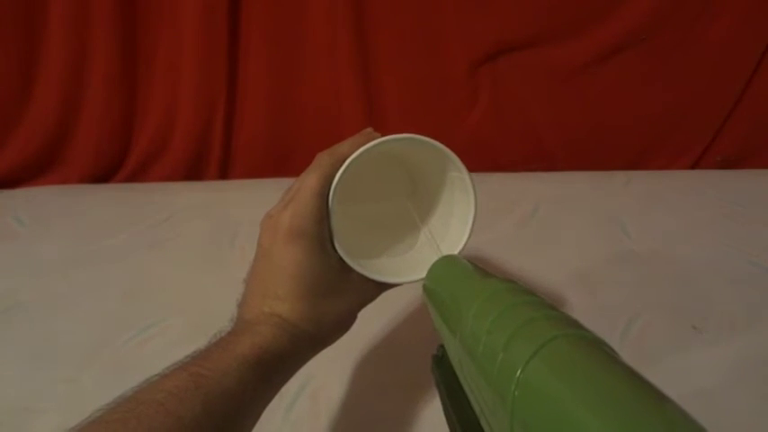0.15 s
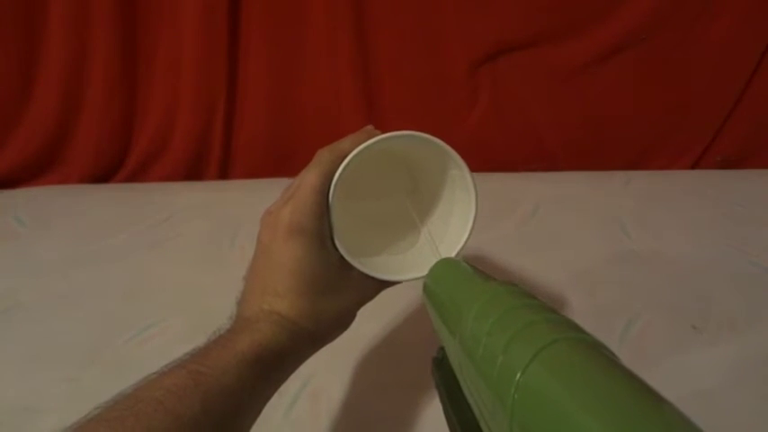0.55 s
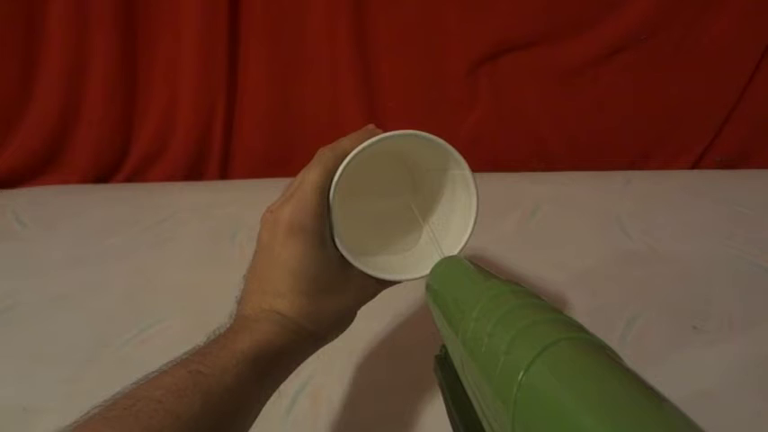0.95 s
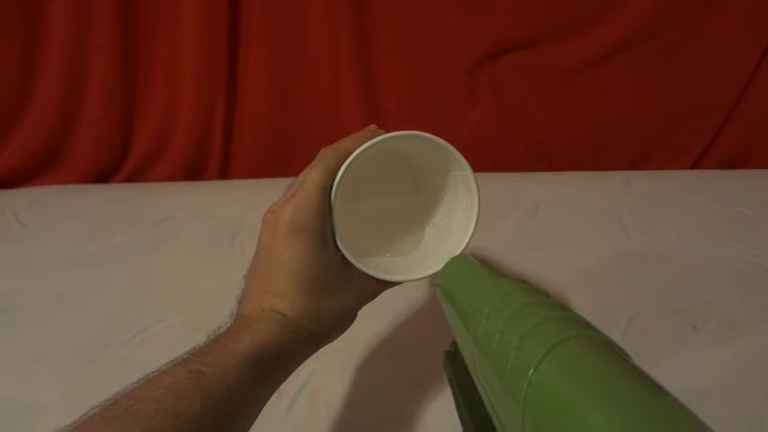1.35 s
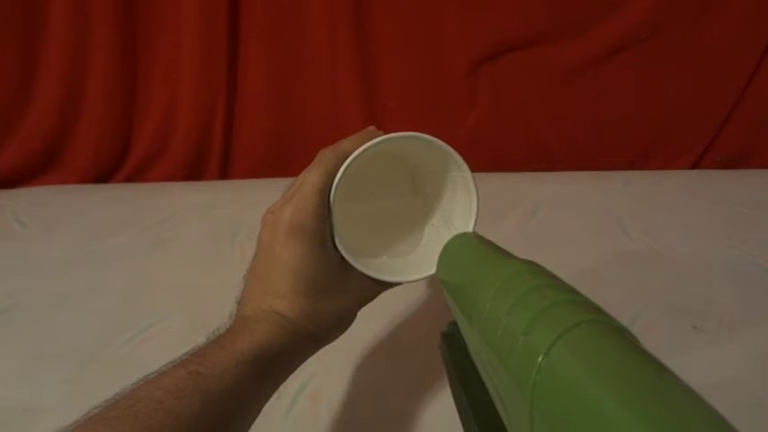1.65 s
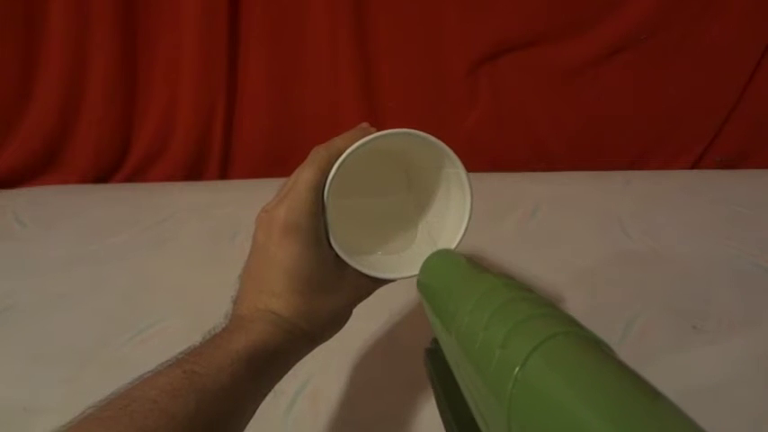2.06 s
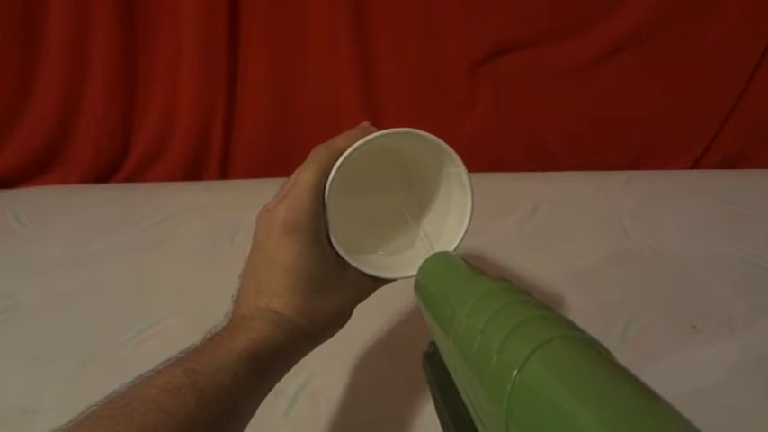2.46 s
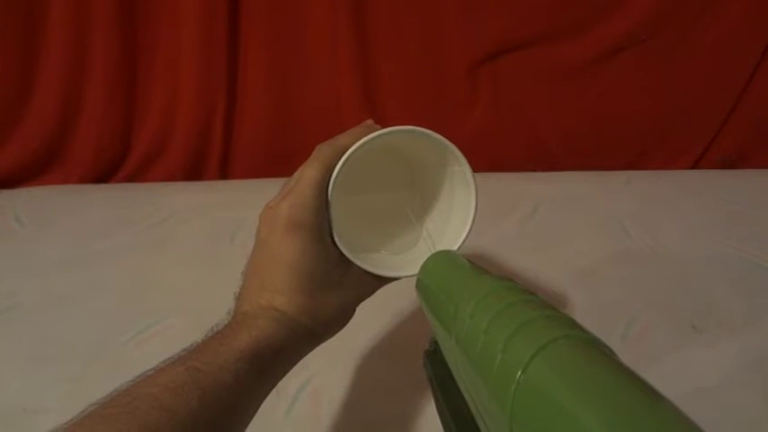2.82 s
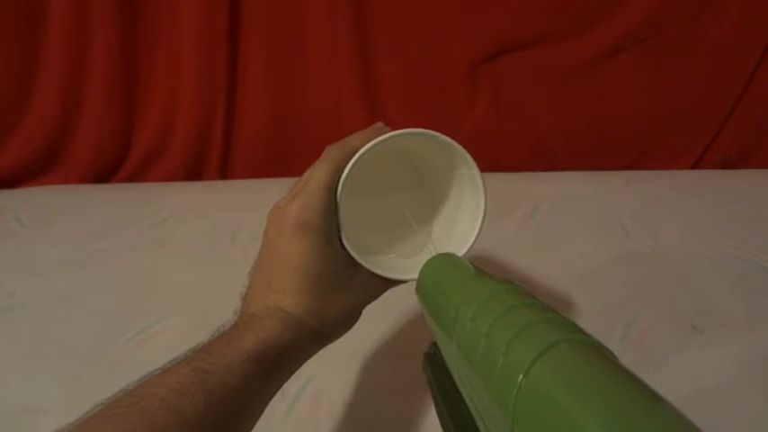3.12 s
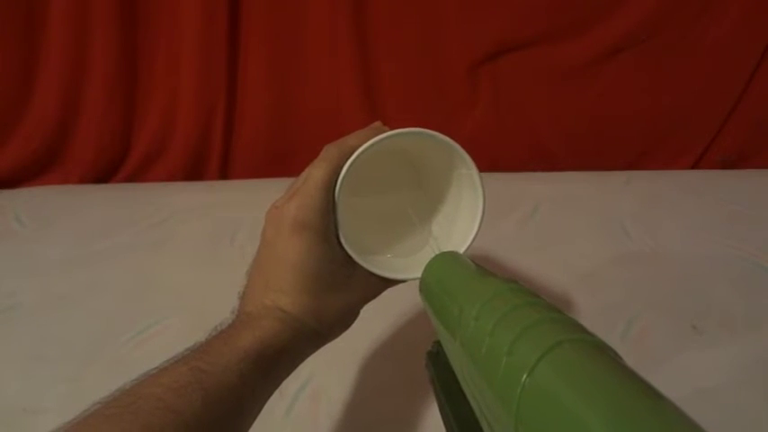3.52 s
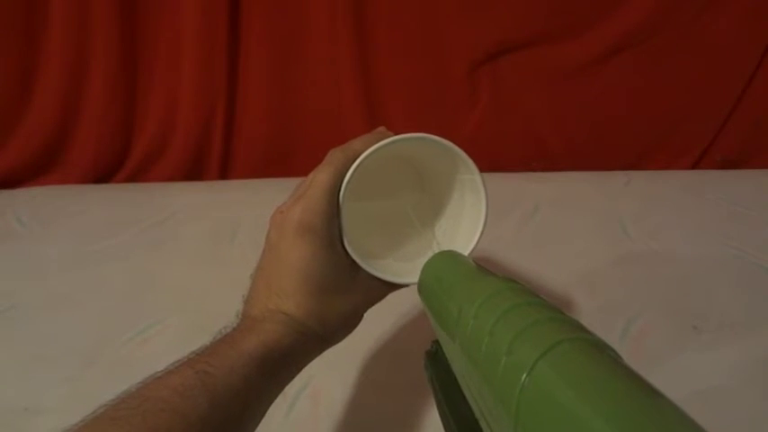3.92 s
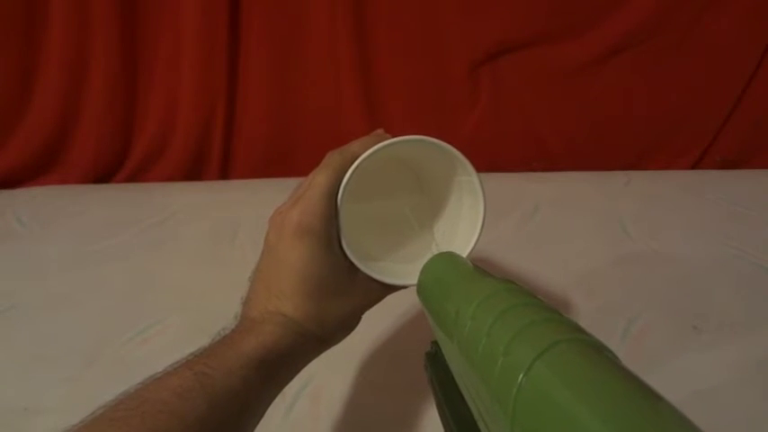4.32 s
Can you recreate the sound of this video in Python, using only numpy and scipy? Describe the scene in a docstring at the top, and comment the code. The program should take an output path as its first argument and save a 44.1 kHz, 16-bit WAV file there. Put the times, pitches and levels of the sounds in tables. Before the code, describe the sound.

Two close, hissing jets of water patter hollowly inside a paper cup, the second longer and ending in a splashy churn.

```python
"""A pump water blaster fires two jets into a hand-held paper cup, close by in a quiet, soft room.
The jet drums the paper wall, whose many modes flare as the spot wanders, and booms the air in the cup.
The nozzle hisses over a faint low shudder, and a few drips ring in the pause. The second squirt opens
as thin mist, lands on the paper, and at the end churns the pooled water."""
import sys
import numpy as np
from scipy import signal
from scipy.io import wavfile
from scipy.ndimage import uniform_filter1d, minimum_filter1d

SR = 44100
rng = np.random.default_rng(int(sys.argv[2]) if len(sys.argv) > 2 else 0)


def pcm_store(signal):
    """Save signal as 16-bit PCM."""
    levels = np.round(np.clip(np.atleast_2d(signal), -1, 1) * 32767)
    wavfile.write(sys.argv[1], SR, levels.astype(np.int16).T)


N = 197607
SIZE, HOP = 2048, 512
HZ = np.fft.rfftfreq(SIZE, 1 / SR)[:, None]
FRAME_S, SAMPLE_S = np.arange(N // HOP + 10) * HOP / SR, np.arange(N) / SR

SHUTS_S = 1.185  # the first squirt ends
# The second squirt: mist starts, the jet lands, rising water damps the cup, the jet sinks in the pool.
MIST_S, LANDS_S, RISES_S, SINKS_S = 1.712, 2.048, 3.284, 3.752
SWELL_OCTAVES, GULP_OCTAVES = 0.26, .35  # reach either side of the centre pitch

# Resonances of the cup: five families in the paper, the paper's lowest modes, three families in the air.
# Each row: pitch in Hz, width in Hz, relative level in dB.
WALL_MODES = [
    [(1877, 82, 1), (2035, 42, 2), (2115, 29, 1.5), (2220, 82, 0.5), (2292, 37, -4)],
    [(2404, 62, 3.5), (2567, 78, 1), (2694, 47, 1), (2747, 40, -3), (2885, 11, 2.5), (2987, 51, 1.5)],
    [(3220, 50, 0), (3196, 53, -3), (3340, 17, 1.5), (3439, 146, 6.5), (3670, 120, -11.5)],
    [(3743, 155, -0.5), (3790, 82, -1), (3993, 150, 1.5), (4110, 74, -8), (4200, 100, -5),
     (4390, 190, -1.5)],
    [(4732, 150, 2.5), (5000, 28, -10), (5200, 64, -2.5), (5078, 82, 3.5), (5340, 54, -1.5), (5300, 160, 0),
     (5487, 93, 5), (5640, 17, -3), (5873, 120, 1.5), (6340, 220, -7)],
]
LOW_WALL_MODES = [(1358, 70, -7.5), (1456, 100, -5.5), (1538, 58, -4), (1682, 350, 5)]
AIR_MODES = [
    [(729.4, 66, 0), (806, 55, -5.5)],
    [(871, 57, -1.5), (928, 48, 1.5)],
    [(1055, 150, -0.5), (1154, 95, 0), (1253, 110, -2)],
]
# How hard the jet plays each family. Each row: centre in Hz, gain in dB for the first squirt, the mist
# and the second squirt, swell time in seconds, slope as the water rises in dB per second, sinking time
# in seconds, gain in the pool in dB, slope from then on in dB per second, wander in dB.
WALL_DRIVE = [(2200, -23, -61, -25.5, 0.027, -6, .03, -37.5, -5, 2),
              (2600, -24, -66, -25, 0.019, -9, .02, -30, -12, 2),
              (3325, -24.5, -66, -20, .008, -4, .015, -25, -11, 1.5),
              (4040, -22.5, -56.5, -22.5, .005, 3, .015, -26, -6.5, 1.5),
              (5440, -22.5, -50, -21, 0.0026, -5.5, .015, -27, 0.5, 1.5)]
LOW_WALL_DRIVE = (1549, -37.5, -67, -36, 0.2, -11.5, .06, -66, -10, 2)
AIR_DRIVE = [(740, -48.5, -71, -40, 0.075, -21, .012, -72, -8, 2.9),
             (884, -44, -77, -36, 0.064, -21, .015, -68, -1, 2.1),
             (1128, -45, -80, -36, 0.06, -8.5, .06, -56, -17, 2.3)]
# Passing swells of the paper and gulps of the air. Each row: peak time in seconds, length in seconds,
# centre pitch in Hz, lift in dB (negative for a dip).
PAPER_SWELLS = [(.05, 0.1, 2340, 7.5), (.13, 0.095, 5300, 6.5), (.15, .3, 3350, -3), (.24, 0.095, 4950, 9),
                (.36, .1, 1550, 5), (.36, .14, 2100, 3), (.48, .12, 1550, -5), (.53, 0.23, 3400, 5),
                (.7, .1, 2300, 5), (.74, .06, 1550, 4), (.85, 0.15, 1580, 5.5), (.88, .12, 2100, 3),
                (.96, .08, 1550, 4), (1.05, .25, 4000, 4), (1.06, .1, 2100, -4), (1.1, .1, 1550, -8),
                (1.14, .12, 5300, 4), (1.15, 0.26, 3200, -5.5), (1.22, .12, 2200, 2.5), (1.9, .15, 1550, 6),
                (2.2, 0.086, 2200, -3), (2.36, .08, 3400, 4), (2.47, 0.17, 2280, 4),
                (2.57, 0.12, 2673, -13), (2.6, 0.11, 3370, 4), (2.7, .05, 2580, 6), (2.7, .1, 5300, -4),
                (2.85, 0.072, 2180, -7), (2.93, 0.16, 4000, 4), (3.05, 0.056, 2700, 6),
                (3.17, .32, 5300, -5), (3.2, 0.096, 1560, 10.5), (3.39, 0.048, 2750, -13),
                (3.5, 0.044, 2800, 5), (3.55, .05, 3200, -6), (3.65, 0.12, 4220, 3),
                (3.78, 0.095, 3800, -21), (4.1, .1, 2100, 4), (4.18, .1, 1550, 8), (4.38, 0.12, 5300, 4)]
AIR_GULPS = [(.078, 0.061, 995, 17.5), (.2, 0.083, 900, 9.5), (.43, .06, 850, 4), (.51, 0.13, 900, 15),
             (.63, .05, 1140, 11.5), (.668, 0.088, 860, 15), (.802, 0.038, 900, 10.5), (.89, 0.039, 890, 5),
             (1.03, 0.029, 900, 7), (1.1, .06, 850, -10), (1.2, 0.069, 920, 16.5),
             (1.235, 0.065, 760, 16.5), (1.33, 0.11, 900, 13), (1.74, .08, 800, 10), (2.03, .1, 820, 16),
             (2.24, 0.059, 1050, 6.5), (2.5, 0.043, 1170, 0), (2.55, .07, 780, -6), (2.65, 0.089, 884, 8.5),
             (2.95, 0.07, 1000, 6.5), (3.11, 0.058, 830, 6.5), (3.27, 0.15, 1060, 2), (3.6, .08, 1150, 3.5),
             (4.18, .1, 1060, 14), (4.45, .08, 820, 13)]
# Fader ride of the hiss, ahead of the valve. Each row: time in seconds, level in dB.
SPRAY_LEVEL = [(0, -29.5), (.06, -21), (.25, -21.5), (.5, -25.5), (1.0, -24.5), (1.15, -20), (1.27, -25),
               (1.72, -34), (1.8, -31), (2.03, -24), (2.3, -24), (2.6, -24.5), (3.0, -23.5), (3.4, -22.5),
               (3.74, -22), (3.79, -17), (3.91, -21.5), (4.26, -17.5), (4.4, -22), (4.48, -20)]
# Crossfade from mist to churning. Each row: time in seconds, share of churning from 0 to 1.
POOL_SHARE = [(0, 0.07), (1.3, 0.2), (1.7, 0.1), (2.0, 0.6), (2.1, 0.3), (2.9, 0.19), (3.3, 0.5), (3.7, .7),
              (3.8, 1), (4.48, 0.96)]
# Tone of thin spray, of the jet in the pool and of the room. Each row: frequency in Hz, relative dB.
MIST_TONE = [(290, -64.5), (500, -36.5), (1160, -49.5), (1730, -21.5), (2210, -9), (2690, -28), (3180, -15),
             (5470, -12), (6070, 0.5), (7960, -5.5), (11000, -11.5), (14300, -55), (22000, -120)]
CHURN_TONE = [(290, -98), (500, -55), (817, -36.5), (930, -20.5), (1110, -23), (1300, -51), (1660, -37),
              (1940, -18), (2550, -16.5), (3710, -4), (4120, -6), (5130, -14), (7960, -13.5), (8720, -8),
              (11000, -4), (14300, -45.5), (22000, -120)]
ROOM_TONE = [(12, -64), (20, -36), (114, -13), (199, -17), (239, -11), (365, -11), (603, -5), (1170, -7.5),
             (1400, -9), (1830, -12), (11000, -24.5), (14300, -67.5), (22000, -120)]
# Bright peaks in the hiss. Each row: centre in Hz, width in Hz, lift in dB.
SIZZLE_PEAKS = [(2196, 100, 0.5), (5040, 300, 6.5), (6920, 200, 4.5), (7590, 80, 1.5), (8680, 790, 3.5),
                (9980, 500, 3), (11030, 200, 4.5)]
# The finest droplets spit. Each row: peak time in seconds, treble tilt in dB.
SPITS = [(1.14, 4), (2.035, 12), (3.11, 3.82), (3.79, 4)]
# Drips in the pause. Each row: start in seconds, level in dB, starting pitch in Hz.
DRIPS = [(1.513, -59, 1740), (1.5394, -65.5, 1486), (1.5763, -60, 1420), (1.5994, -64, 1460),
         (1.6144, -60, 1360), (1.6372, -55.5, 1480)]
# Stereo image of the cup and the room. Each row: frequency in Hz, left-right likeness from -1 to 1.
CUP_LIKENESS = [(60, 0.89), (130, 0.94), (270, 0.92), (570, 0.92), (1210, 0.91), (2570, 0.97), (5450, 0.95),
                (11600, 0.9)]
ROOM_LIKENESS = [(60, 0.91), (220, 0.79), (830, -0.62), (3100, -0.25), (11600, 0.58)]
# Balance of the microphone ports. Each row: frequency in Hz, left minus right in dB.
PORT_LEAN = [(60, 0.8), (170, 0.8), (490, 2), (1410, 1.5), (4040, 1.0), (11600, 0.5)]


def gain_of(db):
    return 10 ** (np.asarray(db) / 20)


def unit_rms(x):
    return x / np.sqrt(np.mean(x ** 2) + 1e-20)


def curve(points):
    """Join (Hz, value) points along a log frequency axis."""
    hz, value = np.transpose(points)
    return np.interp(np.log(HZ + 1), np.log(hz + 1), value)


def drift(rows, ms, across=1):
    """Unit random wander, smooth over ms in time and across neighbouring rows."""
    wander = rng.standard_normal((len(FRAME_S), rows)).T
    frames = max(round(ms * SR / 1000 / HOP), 1)
    for _ in range(2):
        wander = uniform_filter1d(wander, frames, axis=1)
    return unit_rms(uniform_filter1d(wander, across, axis=0))


def flutter(db, ms):
    """Quick random unsteadiness of the jet, as a gain per sample."""
    return gain_of(db * np.interp(SAMPLE_S, FRAME_S, drift(1, ms)[0]))


def noise(colour, likeness=CUP_LIKENESS):
    """Stereo noise that follows a moving colour, every moment equally strong."""
    a, b, c, d = rng.standard_normal((len(FRAME_S), len(HZ), 4)).T
    shared = np.clip(curve(likeness), -1, 1)
    left = a + 1j * b
    right = shared * left + np.sqrt(1 - shared ** 2) * (c + 1j * d)
    spectra = np.array([left, right]) * (colour / np.linalg.norm(colour, axis=0))
    return unit_rms(signal.istft(spectra, nperseg=SIZE, noverlap=SIZE - HOP)[1][:, :N])


def rings(modes, flare_db, ms, skirt):
    """Colour of steep resonances, each swelling and fading on its own."""
    hz, width, db = np.transpose(modes)
    shapes = (1 + (2 * (HZ - hz) / width) ** 2) ** -skirt
    power = gain_of(db[:, None] + flare_db * drift(len(hz), ms)) ** 2
    return np.sqrt(shapes @ power)


def lifts(rows, hz, octaves, order=2):
    """Summed swells or gulps as felt at pitch hz, in dB per frame; a higher order steepens their sides."""
    peak_s, length, centre, db = np.transpose(rows)
    felt_db = db * np.exp(-(np.log2(centre / hz) / octaves) ** 2)
    return np.exp(-(2 * (FRAME_S[:, None] - peak_s) / length) ** order) @ felt_db


def valve(knee_s=.14, fall_db_per_s=450, open_s=.016):
    """Gain of the water flow: the first squirt rounds over into a steady fall, the second opens fast."""
    closing_s = np.hypot(np.maximum(SAMPLE_S - SHUTS_S, 0), knee_s) - knee_s
    opening = 1 - np.exp(-np.maximum(SAMPLE_S - MIST_S, 0) / open_s)
    return gain_of(-fall_db_per_s * closing_s) + opening ** 2


def drive(row, lift_db):
    """Gain of one family of modes through the first squirt, then mist, landing, filling and sinking."""
    _, first_db, mist_db, second_db, swell_s, fill_slope, sink_s, pool_db, pool_slope, wander_db = row
    landed = 1 - np.exp(-np.maximum(SAMPLE_S - LANDS_S, 0) / swell_s)
    under_s = np.maximum(SAMPLE_S - SINKS_S, 0)
    sunk = 1 - np.exp(-under_s / sink_s)
    db = np.where(SAMPLE_S < MIST_S, first_db, mist_db + (second_db - mist_db) * landed)
    db += fill_slope * np.maximum(SAMPLE_S - RISES_S, 0)
    db = (1 - sunk) * db + sunk * (pool_db + pool_slope * under_s)
    return valve() * gain_of(db + np.interp(SAMPLE_S, FRAME_S, lift_db)) * flutter(wander_db, 50)


def paper_wall():
    """The jet drums the paper; where it lands decides which family of modes rings."""
    low_cut = 1 / (1 + (1790 / (HZ + 1)) ** 16)  # the stiff wall radiates little below its ring pitch
    drum = 0
    for row, modes in zip(WALL_DRIVE, WALL_MODES):
        level = drive(row, lifts(PAPER_SWELLS, row[0], SWELL_OCTAVES, order=4))
        drum += level * noise(low_cut * rings(modes, flare_db=4, ms=45, skirt=1.29))
    body = noise(rings(LOW_WALL_MODES, flare_db=7.5, ms=30, skirt=1.6))
    swell_db = lifts(PAPER_SWELLS, LOW_WALL_DRIVE[0], SWELL_OCTAVES, order=4)
    duck_db = 0.39 * lifts(AIR_GULPS, AIR_DRIVE[1][0], GULP_OCTAVES)  # gulps damp the lowest modes
    return flutter(1, 15) * drum + drive(LOW_WALL_DRIVE, swell_db - duck_db) * flutter(0.76, 15) * body


def air_boom():
    """The air in the cup answers the jet in short gulps; the highest family takes over as it fills."""
    boom = 0
    for row, modes in zip(AIR_DRIVE, AIR_MODES):
        level = drive(row, lifts(AIR_GULPS, row[0], GULP_OCTAVES)) * flutter(1.1, 15)
        boom += level * noise(rings(modes, flare_db=2.5, ms=25, skirt=1.9))
    return boom


def spray(spit_s=0.038):
    """Hiss of breaking water: mist from the nozzle blends into churning as the cup fills."""
    pool = np.interp(FRAME_S, *np.transpose(POOL_SHARE))
    spit_db = sum(db * np.exp(-(2 * (FRAME_S - peak_s) / spit_s) ** 2) for peak_s, db in SPITS)
    treble = np.clip((HZ - 8200) / 2000, 0, 1)  # finer droplets sizzle higher
    fine_db = (spit_db - 2 + drift(1, 40)) * treble
    sizzle_db = sum(db / (1 + (2 * (HZ - hz) / width) ** 2) for hz, width, db in SIZZLE_PEAKS)
    colour_db = (1 - pool) * curve(MIST_TONE) + pool * curve(CHURN_TONE) + fine_db + sizzle_db
    shimmer_db = 3.1 * drift(len(HZ), 30, across=20) + 3.4 * drift(len(HZ), 110, across=3)
    ride_db = np.interp(SAMPLE_S, *np.transpose(SPRAY_LEVEL))
    ride_db += 0.37 * np.interp(SAMPLE_S, FRAME_S, spit_db)
    level = valve() * gain_of(ride_db) * flutter(0.56, 12) * flutter(0.9, 45)
    return level * noise(gain_of(colour_db + shimmer_db))


def shudder():
    """A faint, lumpy rumble, nearly alike in both ears, while the jet pushes hard."""
    bass = (1 + (HZ / 60) ** 2) ** -.3 / (1 + (HZ / 500) ** 6)
    landed = np.where(SAMPLE_S < MIST_S, 1, np.clip((SAMPLE_S - LANDS_S) / .025, 0, 1))
    return gain_of(-76) * valve() * landed * flutter(3, 30) * flutter(2.5, 90) * noise(bass)


def room_hush():
    """Steady bed of room and microphone noise."""
    colour_db = curve(ROOM_TONE) + 1.6 * drift(len(HZ), 60, across=4)
    return gain_of(-62.5) * noise(gain_of(colour_db), ROOM_LIKENESS)


def drips(attack_s=0.0014, ring_s=.04):
    """Small drops slide back in the cup, each a short plink that bends upward."""
    track, t = np.zeros(N), np.arange(2000) / SR
    for start, db, hz in DRIPS:
        envelope = gain_of(db - 60 * t / ring_s) * (1 - np.exp(-t / attack_s))
        track[round(start * SR):][:len(t)] += envelope * np.sin(2 * np.pi * hz * t * (1 + 2.7 * t))
    return track


def scene():
    """Water sounds from the cup over the shudder and the room."""
    water = paper_wall() + air_boom() + spray() + drips()
    low_cut = signal.butter(12, 650, "high", fs=SR, output="sos")  # a small cup radiates no bass
    return signal.sosfilt(low_cut, water) + shudder() + room_hush()


def record(dry):
    """Microphone ports lean the sound left, a quick limiter holds the peaks, a steep cut trims the top."""
    lean = gain_of(np.array([curve(PORT_LEAN), -curve(PORT_LEAN)]) / 2)
    spectra = signal.stft(dry, nperseg=SIZE)[2] * lean
    ports = signal.istft(spectra, nperseg=SIZE)[1][:, :N]
    threshold_db, makeup_db, cutoff_hz = -6.5, 0.26, 11010
    level_db = 20 * np.log10(abs(ports).max(0) + 1e-9)
    peak_db = -minimum_filter1d(-level_db, size=121)  # peak hold
    smoothing = signal.windows.hann(121) / 60
    over_db = signal.oaconvolve(np.maximum(peak_db - threshold_db, 0), smoothing, "same")
    limited = ports * gain_of(makeup_db - 0.81 * over_db)
    high_cut = signal.firwin(1023, cutoff_hz, window=("kaiser", 11), fs=SR)
    return signal.oaconvolve(limited, high_cut[None], "same")


dry = scene()
out = record(dry)
pcm_store(out)
```